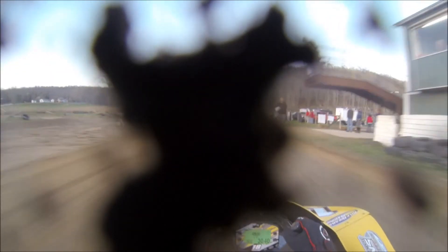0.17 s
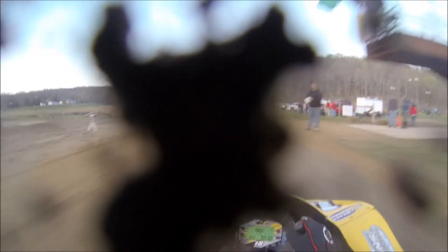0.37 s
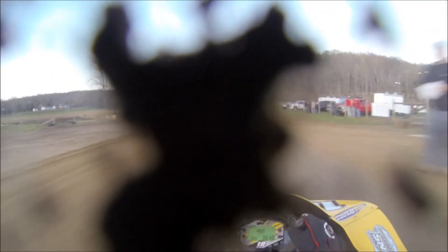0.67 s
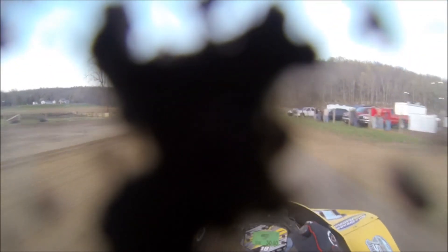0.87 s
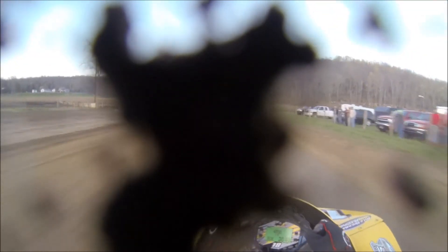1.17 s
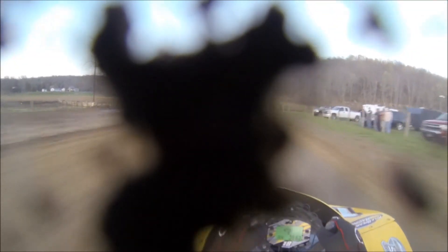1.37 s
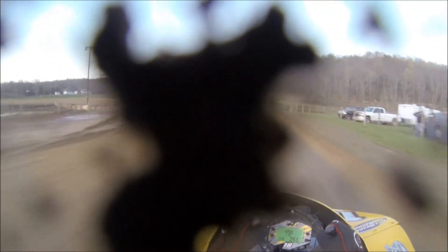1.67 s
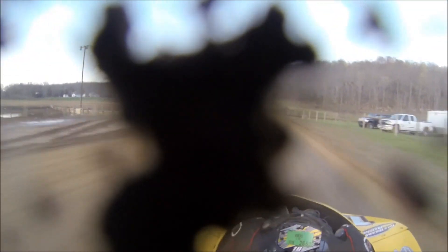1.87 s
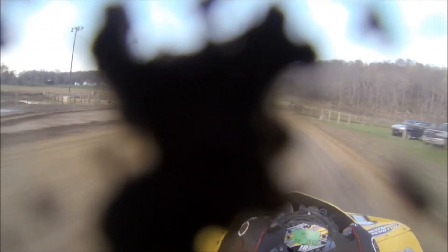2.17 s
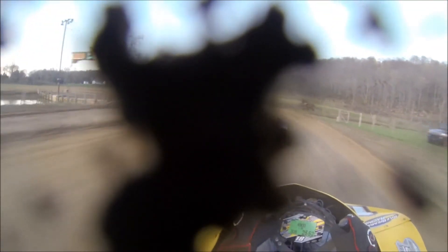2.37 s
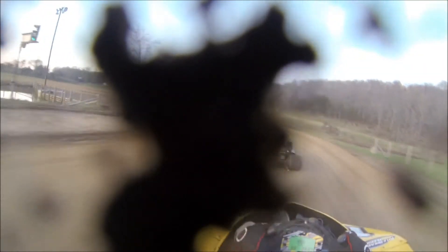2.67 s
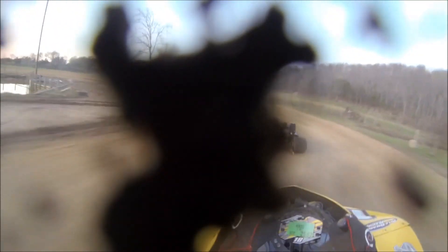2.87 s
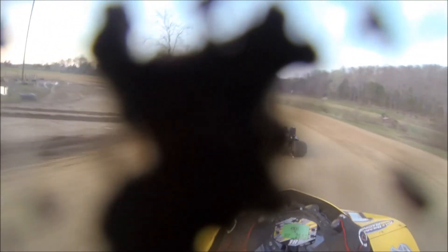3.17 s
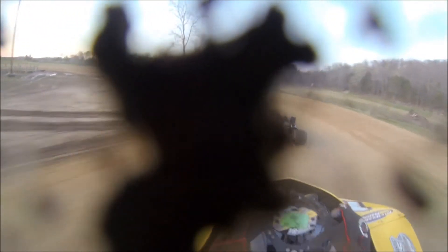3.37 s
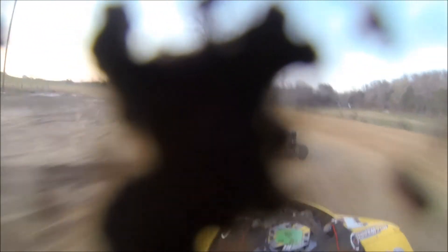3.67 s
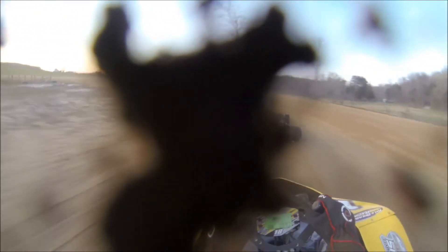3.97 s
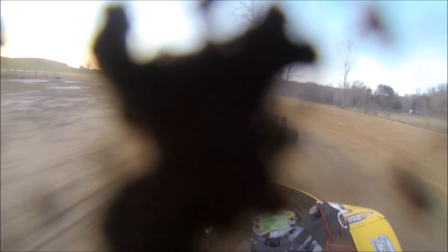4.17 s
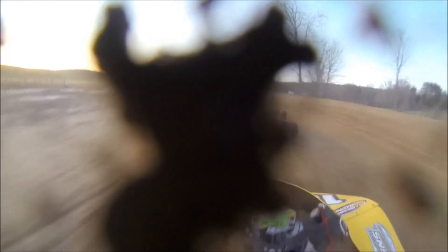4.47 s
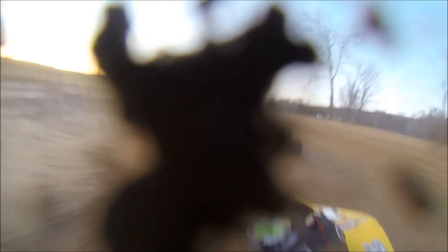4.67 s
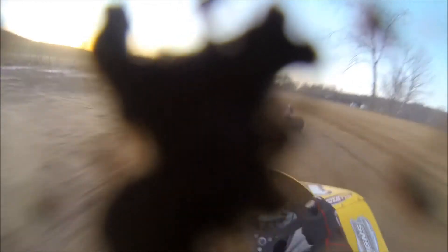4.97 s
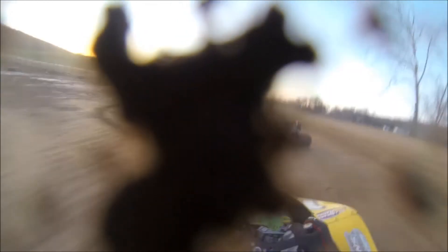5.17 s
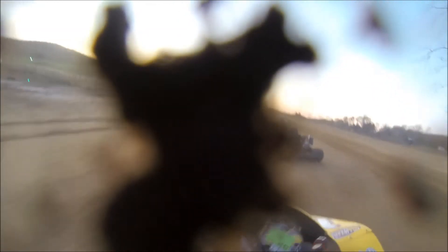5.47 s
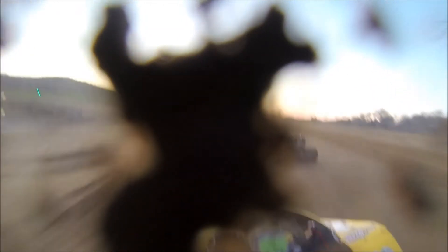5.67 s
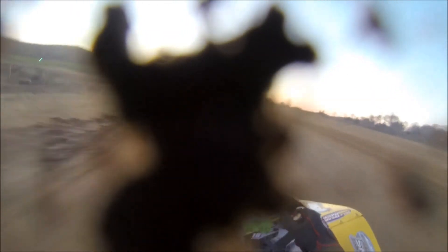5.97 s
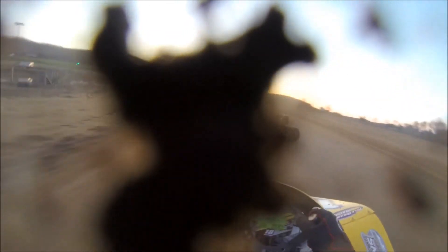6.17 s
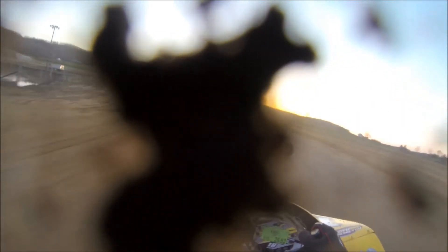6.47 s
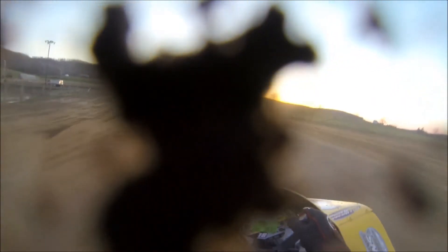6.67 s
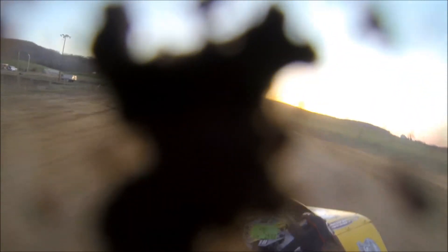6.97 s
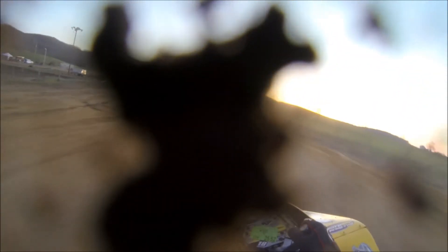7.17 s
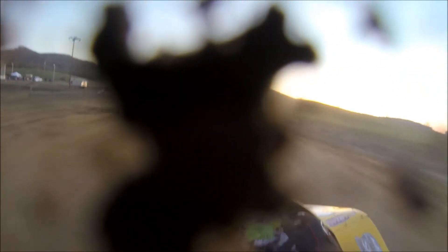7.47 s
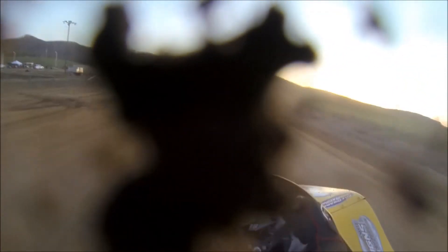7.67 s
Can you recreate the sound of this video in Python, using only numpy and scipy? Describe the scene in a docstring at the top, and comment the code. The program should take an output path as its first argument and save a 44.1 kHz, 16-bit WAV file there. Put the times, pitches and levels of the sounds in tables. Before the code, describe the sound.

Riding on a go-kart outdoors, the microphone picks up a rapid engine throb, buzzing plastic rattle, gritty hiss and low bumps from the dirt track. Twice, flying dirt hits its housing with a sharp crack, and the level drops suddenly before building back. Between the hits the throttle lifts for a bend and the brake scrapes thinly. The engine then carries on at a slightly lower pitch.

```python
"""A single-cylinder four-stroke go-kart laps a dirt track, heard by a camera riding on it in a plastic case.
On the first straight the exhaust drones, the engine rattles the case and ruts shake the frame.
At 2.3 s a clod strikes the case; the camera's gain control ducks and slowly recovers. From 2.6 s the
driver lifts and brakes for a bend, through sprays of dirt, then opens up again from 4.1 s.
At 5.2 s harder clods duck the gain once more, and from 7 s the brake rubs again."""
import sys
import numpy as np
from scipy import signal
from scipy.fft import rfft, irfft, next_fast_len
from scipy.io import wavfile
from scipy.ndimage import uniform_filter1d, minimum_filter1d, map_coordinates

SR = 44100
rng = np.random.default_rng(int(sys.argv[2]) if len(sys.argv) > 2 else 0)


def file_out(sig):
    """Save sig as 16-bit WAV at sys.argv[1]."""
    # one column per channel
    cols = np.atleast_2d(sig).T
    # limit, then scale
    lim = np.clip(cols, -1, 1)
    pcm = np.round(lim * 32767).astype(np.int16)
    wavfile.write(sys.argv[1], SR, pcm)


N = 344848
T = np.arange(N) / SR

LIFT_AT_S, LIFT_S, REOPEN_AT_S, REOPEN_S = 2.605, 0.09, 4.13, 0.82
STRAIGHTEN_AT_S, STRAIGHTEN_S = 4.33, 0.4  # the cornering load comes off the frame
THROTTLE_OPEN, THROTTLE_COASTING = 0.61, 0.2  # shares of full throttle
# base level of each source, and its change in the bend
BUFFET_DB, BUFFET_BEND_DB = -26, -3
FRAME_DB, FRAME_BEND_DB = -25.5, 2.5
HISS_DB, HISS_BEND_DB = -29.5, -0.1
RATTLE_DB, RATTLE_BEND_DB = -19.5, -1.04
EXHAUST_DB, EXHAUST_BEND_DB = -0.05, -6
BARK_FULL_THROTTLE_DB = -27.5
CRUISE_HZ, SHAKE_DB_PER_HZ = 38.05, 0.12  # faster firing makes rattle and hiss louder

# spectral envelopes of the noise sources and of the case: frequency_hz, relative_density_db
BUFFET_SPECTRUM = [(10, -12), (22, 7), (36, 4), (52, -2.5), (75, -13), (120, -27.5), (400, -52)]
FRAME_SPECTRUM = [(30, -29.5), (65, 0), (85, .5), (112, 1.5), (135, -1), (170, -12), (260, -16.5),
                  (500, -18), (800, -44.5), (3000, -99)]
HISS_SPECTRUM = [(500, -20.5), (2500, 4.5), (4700, 3.5), (6500, -4.5), (7500, 2), (8300, -3.5), (9300, 2.5),
                 (9750, 0), (10400, 4), (10900, -2), (11600, -2.5), (12300, -14.5), (13400, -14),
                 (15500, -24)]
BARK_SPECTRUM = [(300, -43), (1200, -25), (2000, -10.5), (2700, -1), (3200, 2), (3620, -32), (3870, 10),
                 (4070, -5), (4270, 13), (4550, -1.5), (5500, -28), (9000, -42), (16000, -49)]
CASE_SPECTRUM = [(200, -14.5), (450, -16), (620, -23), (830, -24), (1120, -22.5), (1250, -15.5), (1380, -5),
                 (1700, 2), (2000, -6), (2300, -15), (3600, -16), (5000, -26), (8000, -25.5),
                 (16000, -79.5)]
# normal modes of the plastic case: centre_hz, width_hz, gain_db
CASE_RESONANCES = [(713, 25, 6.5), (965, 150, 6.5), (1585, 70, 2.2), (1724, 110, 2.5), (2664, 79, 4.5),
                   (3190, 92, 3.5), (3427, 150, 5), (3640, 110, -3.5), (5930, 180, 3.5), (7080, 590, 7),
                   (8760, 220, 3.5)]
# ruts, humps, rough and smooth patches:
# centre_s, width_s, buffet_change_db, frame_change_db, rattle_change_db
GROUND_PATCHES = [(0.208, 0.036, 1.5, 0.5, 0.5), (.45, 0.86, -2.5, 0.5, 2.5), (0.627, 0.027, 7.5, 4.5, 0),
                  (1.3, 0.21, -0.5, -2.5, -1.5), (1.803, 0.13, -0.5, 1, 1), (2.23, .04, 3, 1.5, 0.5),
                  (3.25, .2, -4, .5, 0.5), (4.088, 0.044, 6.5, 1, -0.5), (4.41, 0.052, 0, -4.5, -4.5),
                  (4.47, .025, 15, 0, -0.5), (5.157, 0.033, 3, 7, 0.5), (5.4, .25, 3, -0.5, -1),
                  (5.65, 0.0097, 4, 10, 4), (6.797, 0.077, 0, 4, 0), (7.424, 0.098, 6, 2.5, 0)]
# pads rubbing the disc: start_s, stop_s, level_db
BRAKE_SPANS = [(2.6, 4.118, -34.5), (7, 7.8, -32.5)]
# showers of dirt: centre_s, level_db, width_s
DIRT_SHOWERS = [(.51, -31, 0.021), (2.88, -32.5, 0.036), (3.53, -29, 0.24), (4.157, -27.5, .05),
                (5.068, -25, 0.042), (6.11, -32, .03)]
# jolts that make the case clack: start_s, peak_db
CASE_JOLTS = [(.321, -10), (0.634, -8), (4.901, -5.5), (5.644, -7)]
# dirt striking the case, and at 5.643 s a low knock as the kart hits a bump: start_s, level_db, final_pitch_hz,
# first_pitch_hz, contact_s, relative_thud_db
CLOD_IMPACTS = [(.2015, -10, 4000, 13900, 0.00027, -47.5), (2.297, 9.5, 2320, 4260, 0.00017, -46),
                (3.76, -3, 1890, 3200, 0.00042, -38), (3.76, -6.5, 4400, 14200, .00021, -40),
                (4.335, -3.5, 6870, 12800, .00011, -40), (5.1998, 9, 610, 1730, 0.00081, -11),
                (5.1998, 9.5, 2980, 5450, 0.00021, -47), (5.2019, 18.5, 2100, 2540, 0.00052, -17),
                (5.643, -12, 229.4, 550, 0.0014, -17), (6.0762, -10, 6850, 10600, 0.00032, -38)]
# engine speed: time_s, firing_rate_hz
FIRING_RATE = [(0.0, 38.23), (0.25, 37.99), (0.7, 39.14), (1.25, 39.98), (2.25, 40.77), (2.55, 40.74),
               (2.85, 39.27), (3.3, 38.08), (3.6, 38.09), (4.35, 35.46), (4.7, 35.9), (5.25, 35.96),
               (5.6, 34.64), (6.05, 34.21), (6.85, 34.26), (7.3, 35.38), (7.82, 35.88)]
# harmonics of the exhaust: multiple_of_firing_rate, level_db
EXHAUST_HARMONICS = [(2, -36), (3, -33.5), (4, -42.5), (5, -41), (6, -50), (7, -43), (8, -50), (9, -47),
                     (10, -41), (11, -48), (12, -46.5), (13, -46.5), (14, -51), (15, -56), (16, -55),
                     (18, -59), (19, -59)]
# knocks of piston and valves: delay_after_ignition_cycles, relative_level_db
ENGINE_KNOCKS = [(.07, 0), (.18, -2), (.38, -1.5), (.58, -5), (.87, -4)]


def amp(db):
    """Amplitude ratio of a level in decibels."""
    return 10 ** (np.asarray(db) / 20)


def unit_rms(x):
    """Normalisation to unit mean power."""
    return x / np.sqrt(np.mean(x ** 2) + 1e-20)


def trapezoid(start_s, attack_s, stop_s, release_s):
    """Linear envelope: rises from start_s, holds at 1, falls from stop_s."""
    return np.clip((T - start_s) / attack_s, 0, 1) * np.clip(1 - (T - stop_s) / release_s, 0, 1)


def swell(centre_s, width_s):
    """Gaussian envelope with a peak of 1."""
    return np.exp(-((T - centre_s) / width_s) ** 2 / 2)


def wobble(rate_hz):
    """Slow random modulation: a spline through rate_hz random values a second."""
    return map_coordinates(rng.standard_normal(int(N * rate_hz / SR) + 4), [T * rate_hz])


def coloured(x, spectrum, modes=()):
    """Minimum-phase filtering by a spectral envelope and (centre_hz, width_hz, gain_db) modes, to rms 1."""
    size = 2 * next_fast_len(N // 2 + 8192)
    hz = np.fft.rfftfreq(size, 1 / SR)
    points_hz, points_db = np.transpose(spectrum)
    level_db = np.interp(np.log(hz + 1), np.log(points_hz), points_db)
    for centre_hz, width_hz, gain_db in modes:
        level_db += gain_db / (1 + (2 * (hz - centre_hz) / width_hz) ** 2)
    cepstrum = irfft(np.log(amp(level_db)), size)
    cepstrum[1:size // 2] *= 2  # folding the cepstrum makes the filter causal
    cepstrum[size // 2 + 1:] = 0
    return unit_rms(irfft(rfft(x, size) * np.exp(rfft(cepstrum)), size)[:N])


def bursts(cycles, at, rise, scatter_db, jitter):
    """Quasi-periodic envelope of rms 1, one flare a cycle; at, rise and jitter are in cycles."""
    index = np.floor(cycles - at).astype(int) + 1
    size, shift = rng.standard_normal((2, 400))
    age = np.maximum((cycles - at) % 1 - jitter * np.abs(shift[index]), 0) / rise
    return unit_rms(amp(scatter_db * size[index]) * age * np.exp(-age))


def taps(cycles, at, scatter_db, jitter_s):
    """Quasi-periodic impulse train: one tap a cycle, uneven in size and timing."""
    onsets = np.flatnonzero(np.diff(np.floor(cycles - at)))
    size, shift = rng.standard_normal((2, len(onsets)))
    onsets = np.clip(onsets + jitter_s * SR * shift, 0, N - 1).astype(int)
    return np.bincount(onsets, amp(scatter_db * size), N)


def buffeting(bend):
    """Low-frequency pressure fluctuation: air and ruts push on the camera in slow lumps."""
    ground_db = sum(db * swell(s, width) for s, width, db, _, _ in GROUND_PATCHES)
    pressure = amp(0.9 * wobble(8.7)) * rng.standard_normal(N)
    return amp(BUFFET_DB + BUFFET_BEND_DB * bend + ground_db) * coloured(pressure, BUFFET_SPECTRUM)


def frame_rumble():
    """Structure-borne sound: bumps drum through the unsprung frame and swing the camera's mount."""
    cornering = trapezoid(LIFT_AT_S, LIFT_S, STRAIGHTEN_AT_S, STRAIGHTEN_S)
    ground_db = sum(db * swell(s, width) for s, width, _, db, _ in GROUND_PATCHES)
    bumps = amp(2.2 * wobble(13)) * rng.standard_normal(N)
    rumble = coloured(bumps, FRAME_SPECTRUM, modes=[(109.7, 12.2, 7.5), (310, 50, -4), (500, 90, 2.0)])
    return amp(FRAME_DB + FRAME_BEND_DB * cornering + ground_db) * rumble


def brake():
    """Friction excitation: the pads scrape the disc into a narrow resonance."""
    ramp_s = 0.19
    pressure = sum(amp(db) * trapezoid(start, ramp_s, stop, ramp_s) for start, stop, db in BRAKE_SPANS)
    scrape = amp(3.5 * wobble(12)) * rng.standard_normal(N)
    disc = coloured(scrape, [(1500, -31), (3400, 4), (5000, 0), (9000, -36)], modes=[(3390, 200, 15)])
    return pressure * disc


def sprays():
    """Shot noise: showers of loose dirt strike the case grain by grain."""
    shower = sum(amp(db) * swell(s, width) for s, db, width in DIRT_SHOWERS)
    grit = (rng.random(N) < 3000 / SR) * rng.standard_normal(N)  # 3000 grains a second
    return shower * coloured(grit, HISS_SPECTRUM, CASE_RESONANCES)


def clacks(contact_s=0.0012):
    """Impulse response: a hard jolt knocks the case once against its mount."""
    out = np.zeros(N + SR)
    contact = np.exp(-T / contact_s) * rng.standard_normal(N)
    ring = coloured(contact, CASE_SPECTRUM, CASE_RESONANCES)[:SR // 10]
    for start_s, peak_db in CASE_JOLTS:
        out[round(start_s * SR):][:len(ring)] += amp(peak_db) * ring / np.abs(ring).max()
    return out[:N]


def clods():
    """Inelastic impact: a clod's crack sinks in pitch as it flattens, and the mount rings down."""
    out, t = np.zeros(N + SR), np.arange(SR // 4) / SR
    low_mode = np.sin(2 * np.pi * 108 * t) * amp(-60 * t / 0.15)
    high_mode = np.sin(2 * np.pi * 231 * t) * amp(-60 * t / 0.12)
    mount = -low_mode - 1.5 * high_mode
    for start_s, level_db, final_hz, first_hz, contact_s, thud_db in CLOD_IMPACTS:
        pitch_hz = final_hz + (first_hz - final_hz) * np.exp(-t / (2 * contact_s))
        crumbs = 0.05 * rng.standard_normal(len(t))
        force = t / contact_s * np.exp(1 - t / contact_s)
        crack = force * (np.sin(2 * np.pi * np.cumsum(pitch_hz) / SR) + crumbs)
        out[round(start_s * SR):][:len(t)] += amp(level_db) * (crack + amp(thud_db) * mount)
    return out[:N]


def hiss(cycles, throttle):
    """Incoherent addition: mechanical hiss at each firing, over steady noise and a patter of grit."""
    flare = bursts(cycles, at=0.04, rise=0.105, scatter_db=1, jitter=0.012)
    clatter = 1.8 * throttle * flare * rng.standard_normal(N)
    grains = rng.random(N) < 1500 / SR
    grit = grains * rng.standard_normal(N) * amp(2 * rng.standard_normal(N))
    total = clatter + rng.standard_normal(N) + 0.82 * unit_rms(grit)
    return coloured(total / np.sqrt(1 + throttle ** 2), HISS_SPECTRUM, CASE_RESONANCES)


def bark(cycles):
    """Amplitude-modulated noise: every firing throws a rough burst out of the engine."""
    flare = bursts(cycles, at=0.08, rise=0.125, scatter_db=1, jitter=0.02) + 0.2
    return coloured(flare * rng.standard_normal(N), BARK_SPECTRUM, modes=[(2660, 170, 18)])


def exhaust(cycles, waver_db, smear_rad):
    """Fourier series: the pipe's pulses as harmonics of the firing rate, wavering in the airstream."""
    note = np.zeros(N)
    for order, db in EXHAUST_HARMONICS:
        phase = 2 * np.pi * order * cycles + rng.uniform(0, 2 * np.pi) + smear_rad * wobble(7)
        note += amp(db + waver_db * wobble(6)) * np.sqrt(2) * np.cos(phase)
    return note


def rattle(cycles, throttle):
    """Forced vibration: engine knocks, their chatter and jolts from the track keep the case ringing."""
    knocks = sum(amp(db) * taps(cycles, at, scatter_db=1, jitter_s=0.00015) for at, db in ENGINE_KNOCKS)
    highpass = signal.butter(2, 800, "highpass", fs=SR, output="sos")  # light parts carry no bass
    knocks = unit_rms(signal.sosfilt(highpass, knocks))
    flares = sum(amp(db) * bursts(cycles, at, rise=0.033, scatter_db=2.5, jitter=0.031)
                 for at, db in ENGINE_KNOCKS)
    chatter = unit_rms(flares) * rng.standard_normal(N)
    shaking = (0.5 + 0.5 * throttle) * (0.46 * knocks + 0.58 * chatter)
    jolts = amp(1.03 * wobble(45)) * rng.standard_normal(N)
    return coloured(shaking + jolts, CASE_SPECTRUM, CASE_RESONANCES)


def engine(bend):
    """Periodic excitation: one firing cycle times the exhaust, bark, case rattle and hiss."""
    firing_hz = np.interp(T, *np.transpose(FIRING_RATE))
    cycles = np.cumsum(firing_hz) / SR + 0.8  # ignition falls on whole numbers
    throttle = THROTTLE_OPEN + (THROTTLE_COASTING - THROTTLE_OPEN) * bend
    speed_db = SHAKE_DB_PER_HZ * (firing_hz - CRUISE_HZ)
    ground_db = sum(db * swell(s, width) for s, width, _, _, db in GROUND_PATCHES)
    out = amp(EXHAUST_DB + EXHAUST_BEND_DB * bend) * exhaust(cycles, waver_db=1.3, smear_rad=0.12)
    out += amp(BARK_FULL_THROTTLE_DB) * throttle * bark(cycles)
    out += amp(RATTLE_DB + RATTLE_BEND_DB * bend + speed_db + ground_db) * rattle(cycles, throttle)
    out += amp(HISS_DB + HISS_BEND_DB * bend + speed_db + 0.1 * ground_db) * hiss(cycles, throttle)
    return out


def scene():
    """Superposition of all sources at the camera, through one bend between two straights."""
    bend = trapezoid(LIFT_AT_S, LIFT_S, REOPEN_AT_S, REOPEN_S)
    return (engine(bend) + buffeting(bend) + frame_rumble() + brake() + clacks() + sprays() + clods())[None]


def gain_control(x, ceiling_db, recovery_db_per_s, treble_weight, ahead_s):
    """Look-ahead limiting: the gain falls just before a peak, sharp ones most, then climbs back."""
    peak = np.abs(x) + treble_weight * np.abs(np.gradient(x))
    needed_db = np.minimum(0, ceiling_db - 20 * np.log10(peak + 1e-9))
    needed_db = minimum_filter1d(needed_db, 2 * int(ahead_s * SR) + 1)
    climb_db = recovery_db_per_s * T
    gain_db = np.minimum.accumulate(needed_db - climb_db) + climb_db
    return x * amp(uniform_filter1d(gain_db, size=64))


def record(dry):
    """Finite dynamic range and bandwidth: the camera limits, saturates and cuts the highest treble."""
    limited = gain_control(dry[0], ceiling_db=6, recovery_db_per_s=12.5, treble_weight=2.86, ahead_s=0.019)
    saturated = np.clip(limited, -1, 1)
    passband = np.fft.rfftfreq(N, 1 / SR) < 15300
    return irfft(rfft(saturated) * passband, N)[None]


dry = scene()
out = record(dry)
file_out(out)
```